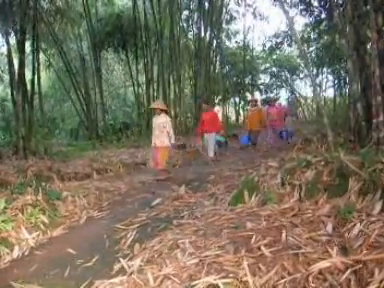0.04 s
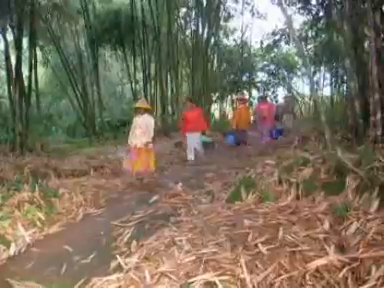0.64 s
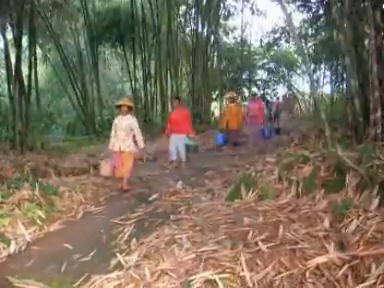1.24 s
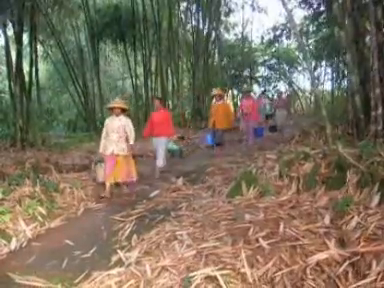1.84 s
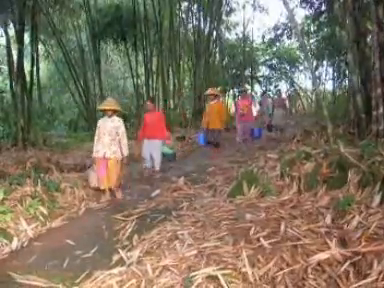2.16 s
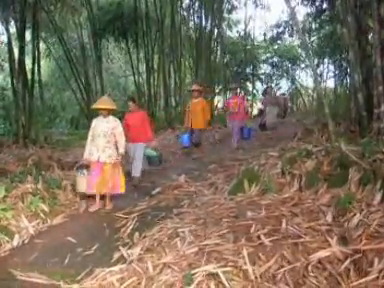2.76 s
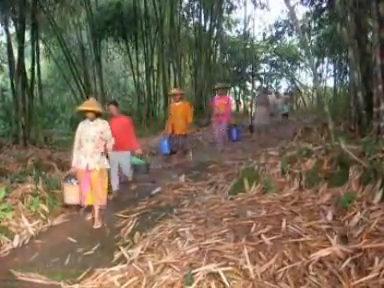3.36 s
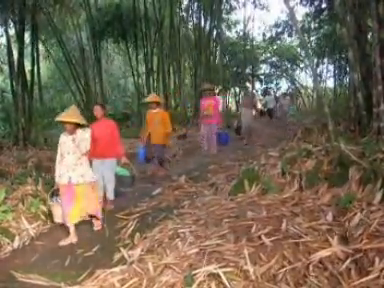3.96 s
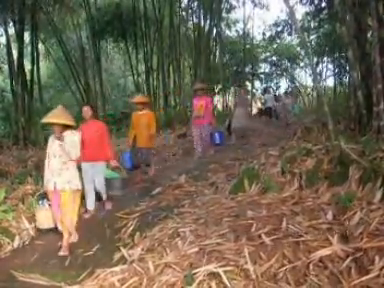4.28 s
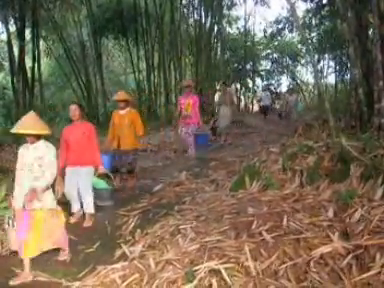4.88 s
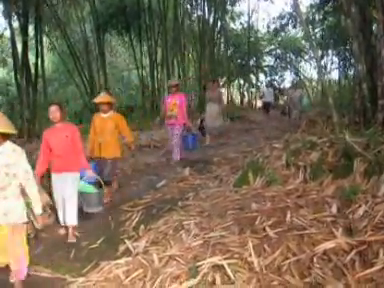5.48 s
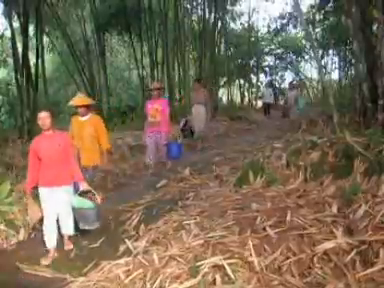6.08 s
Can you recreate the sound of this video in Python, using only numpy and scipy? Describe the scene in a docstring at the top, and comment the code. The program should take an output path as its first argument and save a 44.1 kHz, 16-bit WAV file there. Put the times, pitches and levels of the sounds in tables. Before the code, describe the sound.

A songbird sings repeated warbling phrases and trilled falling notes in a bamboo grove, over a quiet hiss of leaves and air.

```python
"""A leafy hiss and a low murmur of air fill a bamboo grove, with a thin insect tone, a hum and faint far birds.
A near songbird sings six two-note phrases (a warble, then a quick dip and rise), with one dry snap
in the first. It goes on to five trilled falling slurs, the first three each answered by a low buzz.
Every bird note is a near-pure tone modulated in frequency and amplitude; fast modulation makes the
trills and buzzes. The stems scatter each note into early echoes and a diffuse reverberant tail."""
import sys
import numpy as np
from scipy import signal
from scipy.fft import rfft, irfft, next_fast_len
from scipy.io import wavfile
from scipy.ndimage import uniform_filter1d, map_coordinates

SR = 44100
rng = np.random.default_rng(int(sys.argv[2]) if len(sys.argv) > 2 else 0)


def to_wav(s):
    """Save 16-bit WAV."""
    ch = np.atleast_2d(s).T  # columns
    pcm = np.round(np.clip(ch, -1, 1) * 32767)  # PCM
    wavfile.write(sys.argv[1], SR, pcm.astype(np.int16))


N = 269892
T = np.arange(N) / SR
RELEASE_S, RELEASE_DB = 0.017, -16  # the dying end of a warble or slur


def amp(db):
    """Decibels as an amplitude ratio."""
    return 10 ** (np.asarray(db) / 20)


def unit(x):
    """Normalisation to rms 1."""
    return x / np.sqrt(np.mean(x ** 2) + 1e-20)


def along(points, hz):
    """Interpolation of (Hz, value) points on a logarithmic frequency axis."""
    point_hz, values = np.transpose(points)
    return np.interp(np.log(hz + 1), np.log(point_hz + 1), values)


def curves(rows, t=T):
    """Linear interpolation, at the times t, of each column after the first, which is time."""
    times, *columns = np.transpose(rows)
    return [np.interp(t, times, column) for column in columns]


def wobble(rate, t=T, knots=8192):
    """Smooth random modulation: a spline through rate random knots a second."""
    return map_coordinates(rng.standard_normal(knots), [t * rate], mode="wrap")


def filtered(x, response):
    """Linear filtering: the spectrum of x is multiplied by a frequency response."""
    size = next_fast_len(N + SR // 2)
    return irfft(rfft(x, size) * response(np.fft.rfftfreq(size, 1 / SR)), size)[..., :N]


def add(track, start_s, sound):
    """Superposition: the sound adds to the track from start_s on."""
    start = max(round(start_s * SR), 0)
    part = sound[:max(N - start, 0)]
    track[start:start + len(part)] += part


def sine(hz):
    """A tone of rms 1 whose phase is the integral of its frequency."""
    return np.sqrt(2) * np.sin(2 * np.pi * np.cumsum(hz) / SR)


def rush(spectrum, patchy_db):
    """Coloured noise of rms 1, its gain varying in patches of time and frequency."""
    bins = signal.stft(rng.standard_normal(N), nperseg=1024)[2]
    patches = uniform_filter1d(rng.standard_normal(bins.shape), size=5, axis=0)
    patches = uniform_filter1d(patches, size=8, axis=1)
    noise = signal.istft(bins * amp(patchy_db * unit(patches)), nperseg=1024)[1][:N]
    return unit(filtered(noise, lambda hz: amp(along(spectrum, hz))))


def air_murmur(air_db):
    """Moving air gives low-frequency noise, strongest from 170 to 200 Hz."""
    # Each row: frequency in Hz, relative spectral density in dB.
    spectrum = [(25, -27), (60, -29.5), (105, -36), (135, -18), (170, 0), (200, 0), (225, -10), (260, -4),
                (340, -12.5), (450, -19.5), (700, -34.5), (1500, -72)]
    return amp(air_db + 0.46) * rush(spectrum, patchy_db=0.5)


def leaf_hiss():
    """Leaves give broadband noise under a slowly changing envelope."""
    # Each row: time in seconds, relative level in dB.
    levels = [(0.0, -61), (1.86, -59), (2.07, -60), (2.39, -56.5), (2.66, -65), (3.78, -61), (4.0, -67),
              (5.75, -60.5)]
    # Each row: frequency in Hz, relative spectral density in dB.
    spectrum = [(200, -38), (500, -16), (800, -14), (1300, -9), (1500, -4.5), (1630, 0), (1800, -2.5),
                (2300, -0.5), (3200, -5.5), (4200, -10), (5500, -20), (7000, -32.5), (9000, -47.5),
                (10000, -58)]
    return amp(curves(levels)[0] + 15.5) * rush(spectrum, patchy_db=2)


def insect(hz=3740):
    """Random frequency modulation spreads an insect's wavering tone into a narrow band."""
    # Each row: time in seconds, relative level in dB.
    levels = [(0, -61.5), (.4, -60.5), (1.4, -60.5), (2.2, -69), (6.1, -63.5)]
    envelope = amp(curves(levels)[0] + 3.5 * wobble(5.2))
    return envelope * sine(hz + 22 * wobble(120) + 15 * wobble(2.1))


def hum(air_db, hz=63.4, fade_db_per_s=1.34):
    """A faint low sinusoid follows the level of the air, times an exponential decay."""
    return amp(air_db - 18 - fade_db_per_s * T) * sine(hz + .2 * wobble(3.3))


def background():
    """Four continuous sources superpose; the murmur and the hum share an envelope."""
    # Each row: time in seconds, relative level in dB.
    air_levels = [(0.0, -48), (0.52, -43.5), (1.64, -43.5), (2.79, -48.5), (3.74, -47.5), (4.29, -53.5),
                  (6.0, -46)]
    air_db, = curves(air_levels)
    return air_murmur(air_db) + leaf_hiss() + insect() + hum(air_db)


def whistle(points, jitter, swing_hz=0, trill_rate=100, pulsing=0, flutter_db=2, rasp_db=-42, fade=.005):
    """A bird's note is a tone modulated in frequency and amplitude. Returns its start time and sound."""
    # Each point: time in seconds, pitch in Hz, level in dB and, optionally, trill depth from 0 to 1.
    t = np.arange(points[0][0] - fade, points[-1][0] + fade, 1 / SR)
    age = t - t[0]
    hz, db, *trill = curves(points, t)
    depth = trill[0] if trill else 1
    beat_hz = trill_rate * (1 + .24 * wobble(200, age, knots=512))
    beat = 2 * np.pi * np.cumsum(beat_hz) / SR
    # each beat of a trill is a short upward sweep, loudest in its middle
    sweep = -swing_hz * depth * (np.sin(beat) + 0.45 * np.sin(2 * beat))
    pulse = 1 - np.clip(pulsing * depth, 0, 1) * np.cos(beat)
    glide = uniform_filter1d(hz, size=220) * (1 + jitter * wobble(393.9, age, knots=512))
    ramp = np.clip(np.minimum(age, t[-1] - t) / (1.6 * fade), 0, 1)
    rasp = amp(rasp_db) * rng.standard_normal(SR // 2)[:len(t)]
    envelope = amp(db + flutter_db * wobble(170, age, knots=512)) * np.sin(np.pi / 2 * ramp) ** 2
    return t[0], envelope * pulse * (sine(glide + sweep) + rasp)


def grove(stems_db, stems_t60, tail_db, echoes_per_s=450):
    """An impulse response: the direct path, sparse echoes off near stems and the grove's diffuse tail."""
    # Each row: frequency in Hz, reverberation time (to fall 60 dB) in seconds.
    decay_times = [(1500, 0.17), (2500, 0.53), (4200, 0.24), (9000, 0.77)]
    hz, t, bins = signal.stft(rng.standard_normal(SR // 2), SR, nperseg=256)
    decay = amp(-60 * t / along(decay_times, hz)[:, None])
    tail = signal.istft(bins * decay, SR, nperseg=256)[1]
    t = np.arange(len(tail)) / SR
    tail *= 1 - np.exp(-t / 0.024)  # the diffuse field takes time to build
    polarity = rng.choice([-1, 1], len(t))
    arrivals = (rng.random(len(t)) < echoes_per_s / SR) * (t > .003)
    stems = polarity * arrivals * amp(-60 * t / stems_t60)
    response = amp(stems_db) * stems / np.linalg.norm(stems) + amp(tail_db) * tail / np.linalg.norm(tail)
    response[0] += 1  # direct sound
    return response


def scatter(notes, stems_db, stems_t60, tail_db):
    """Multipath propagation: the bird turns its head, so each note is convolved with new paths."""
    track = np.zeros(N)
    for start, note in notes:
        add(track, start, signal.fftconvolve(note, grove(stems_db, stems_t60, tail_db)))
    return track


def far_birds():
    """Short glides from deep in the grove arrive faint, with echoes nearly as strong as the direct sound."""
    # Each row: start and length in seconds, first and last pitch in Hz, relative level in dB.
    calls = [ (0.115, 0.021, 2310, 2470, -39), (0.171, 0.016, 2517, 2980, -40.5),
             (0.219, .045, 2290, 1934, -46.5), (0.267, 0.082, 2910, 3820, -49.5),
             (0.387, 0.019, 2300, 2606, -38.5), (0.453, .026, 2783, 2690, -44),
             (1.937, 0.031, 2560, 2665, -39.5), (2.281, 0.12, 1958, 2094, -45.5),
             (2.512, .07, 2010, 2210, -45.5), (3.111, 0.056, 2393, 2383, -38.5),
             (3.615, .06, 2408, 2130, -41), (4.323, 0.019, 4230, 4435, -48.5),
             (4.507, 0.018, 4450, 3790, -54), (4.926, 0.03, 4400, 3680, -54),
             (5.078, .035, 4110, 4400, -51.5), (5.886, .03, 3760, 3790, -48.5),
             (6.038, 0.046, 3860, 4070, -46.5), ]
    notes = [whistle([(start, from_hz, db), (start + length, to_hz, db)], jitter=0.023, fade=0.0073)
             for start, length, from_hz, to_hz, db in calls]
    return amp(-0.5) * scatter(notes, stems_db=-3, stems_t60=0.18, tail_db=-16.5)


def rounded(points, roundness=0.59):
    """Eased interpolation: the pitch slows into each turning point, the other values run straight."""
    times, hz, *others = np.transpose(points)
    t = np.linspace(times[0], times[-1], 200)
    index = np.arange(len(times))
    step = np.interp(t, times, index)
    arc = step - roundness * np.sin(2 * np.pi * step) / (2 * np.pi)
    return np.transpose([t, np.interp(arc, index, hz)] + [np.interp(t, times, c) for c in others])


def warbles():
    """Slow frequency modulation: two crests with a softer trough between, then a held tone."""
    # Each row: first crest and crest spacing in seconds, trough and held pitch in Hz, hold in seconds,
    # relative levels of first crest, second crest and held tone in dB.
    rows = [ (1.548, .044, 2210, 2233, 0.0062, -23, -16, -15),
            (1.996, 0.039, 2362, 2530, 0.027, -17.5, -7, -23),
            (2.397, .054, 2510, 2492, 0.05, -18, -9, -18.5),
            (2.873, 0.052, 2183, 2495, .042, -21, -15.5, -20.5),
            (3.377, .054, 2293, 2491, 0.019, -20.5, -13.5, -17),
            (3.794, 0.049, 2155, 2467, 0.066, -17, -15.5, -21.5), ]
    notes = []
    for crest, period, trough_hz, held_hz, hold, first_db, second_db, held_db in rows:
        settled = crest + period + .02
        contour = rounded([(crest - .017, 2635, first_db - 7.5),
                           (crest, 3090, first_db),
                           (crest + 0.47 * period, trough_hz, first_db - 4.5),
                           (crest + period, 2940, second_db),
                           (settled, held_hz, held_db),
                           (settled + hold, held_hz, held_db - 4.5),
                           (settled + hold + RELEASE_S, 2570, held_db + RELEASE_DB)])
        notes.append(whistle(contour, jitter=0.0088, flutter_db=4, rasp_db=-43.5))
    return notes


def snap(t60=0.026, attack_s=.0004):
    """One damped mode, decaying exponentially, is heard as a small dry tick."""
    # Each row: start in seconds, pitch in Hz, relative level in dB.
    ticks = [(1.5745, 3750, -22)]
    track, t = np.zeros(N), np.arange(SR // 20) / SR
    for start, hz, db in ticks:
        envelope = amp(db - 60 * t / t60) * (1 - np.exp(-t / attack_s))
        add(track, start, envelope * np.sin(2 * np.pi * hz * t))
    return track


def dips():
    """A down-chirp joins an up-chirp: each is loudest halfway, and the voice thins at the turn."""
    # Each row: time of the turn, fall and rise in seconds, start, bottom and top pitch in Hz,
    # relative level and its change at the turn in dB.
    rows = [ (1.728, .024, 0.026, 3736, 2990, 4504, -17, -21),
            (2.192, .023, 0.034, 3950, 3013, 4610, -14.5, -10.5),
            (2.622, .03, 0.024, 3970, 2775, 4610, -16.5, -22),
            (3.084, .03, 0.029, 4150, 3150, 4910, -20, -23.5),
            (3.591, .03, .033, 4127, 2995, 4990, -18.5, -4.5),
            (4.029, .027, 0.035, 4230, 2834, 4560, -19.5, -5), ]
    notes = []
    for turn, fall, rise, start_hz, bottom_hz, top_hz, db, turn_db in rows:
        contour = [(turn - fall, start_hz, db - 9),
                   (turn - fall / 2, bottom_hz + 0.53 * (start_hz - bottom_hz), db),
                   (turn, bottom_hz, db + turn_db),
                   (turn + rise / 2, bottom_hz + .42 * (top_hz - bottom_hz), db),
                   (turn + rise, top_hz, db - 10)]
        notes.append(whistle(contour, jitter=0.02, flutter_db=4, rasp_db=-44, fade=0.0025))
    return notes


def slurs(trill_start_db=-36.5, trill_end_db=-22, clear_s=0.013, clear_depth=0.067):
    """A swelling trill loses modulation depth and clears into a near-pure tone that slides down."""
    # Each row: time of the top note, trill, fall and hold in seconds, trill, top, low and end pitch
    # in Hz, relative levels of the top and low notes in dB.
    rows = [ (4.301, 0.056, 0.027, 0.049, 3150, 3057, 2476, 2282, -18.5, -23),
            (4.833, 0.044, 0.024, .027, 3085, 3074, 2252, 2350, -21.5, -15.5),
            (5.355, .053, .036, .018, 2873, 2973, 2320, 2465, -12, -17),
            (5.815, 0.048, 0.028, .034, 2880, 2960, 2140, 2262, -16, -13.5),
            (6.12, 0.098, 0.025, .03, 2553, 2887, 2250, 2250, -14.5, -15), ]
    notes = []
    for top, trill, fall, hold, trill_hz, top_hz, low_hz, end_hz, top_db, low_db in rows:
        low = top + fall
        contour = rounded([(top - trill, trill_hz, trill_start_db, 1),
                           (top - clear_s, (trill_hz + top_hz) / 2, trill_end_db, 1),
                           (top - clear_s / 2, top_hz, (trill_end_db + top_db) / 2, 2 * clear_depth),
                           (top, top_hz, top_db, clear_depth),
                           (low, low_hz, low_db, clear_depth),
                           (low + hold, end_hz, low_db - 6, clear_depth),
                           (low + hold + RELEASE_S, end_hz, low_db + RELEASE_DB, .5)])
        notes.append(whistle(contour, swing_hz=290, trill_rate=95, pulsing=0.7,
                             jitter=.012, flutter_db=-1.5, rasp_db=-43))
    return notes


def buzzes(attack_s=0.017, accent_s=.028, hz_per_db=30):
    """Deep, fast modulation is heard as roughness; at one accent, effort lifts pitch and level together."""
    # Each row: start and length in seconds, pitch in Hz, relative level in dB,
    # time of the accent in seconds, its gain in dB.
    rows = [ (4.435, 0.22, 1958, -35, 4.545, 8.5), (4.965, 0.2087, 1860, -31, 5.065, 2),
            (5.483, 0.16, 1956, -31, 5.58, 4.5), ]
    notes = []
    for start, length, hz, db, accent, accent_db in rows:
        t = start + np.linspace(0, length, 40)
        effort_db = accent_db * np.exp(-((t - accent) / accent_s) ** 2)
        swell_db = -8 * np.exp(-(t - start) / attack_s)
        contour = np.transpose([t, hz + hz_per_db * effort_db, db + effort_db + swell_db])
        notes.append(whistle(contour, swing_hz=121, trill_rate=115, pulsing=0.77,
                             jitter=0.025, flutter_db=1.1, rasp_db=-49.5))
    return notes


def near_bird():
    """Close to the singer the direct sound dominates; each kind of note has its own share of echo."""
    warble_notes, dip_notes, slur_notes, buzz_notes = warbles(), dips(), slurs(), buzzes()
    return (amp(-0.5) * scatter(warble_notes, stems_db=-8.5, stems_t60=0.17, tail_db=-18)
            + amp(-2.5) * scatter(dip_notes, stems_db=-8.5, stems_t60=0.13, tail_db=-14)
            + amp(0.36) * scatter(slur_notes, stems_db=-8.5, stems_t60=0.059, tail_db=-16)
            + amp(-2.5) * scatter(buzz_notes, stems_db=-6.5, stems_t60=0.05, tail_db=-28.5))


def scene():
    """All sources superpose at one point; a level difference between channels places them to the right."""
    return (near_bird() + far_birds() + snap() + background()) * amp([[-2.5], [2]])


def record(dry, limit_db=-12, ceiling=0.67, hardness=2.73, lopsided=0.051, top_hz=9600):
    """A fast limiter flattens the loudest notes, the input stage saturates, and a steep low-pass follows."""
    power = np.abs(uniform_filter1d(np.mean(dry ** 2, axis=0), size=90))
    limited = dry / np.sqrt(np.hypot(1, power / amp(limit_db) ** 2))
    saturated = limited / (1 + np.abs(limited / ceiling) ** hardness) ** (1 / hardness)
    even_harmonics = lopsided * saturated ** 2
    return filtered(saturated + even_harmonics, lambda hz: hz < top_hz)


dry = scene()
out = record(dry)
to_wav(out)
```